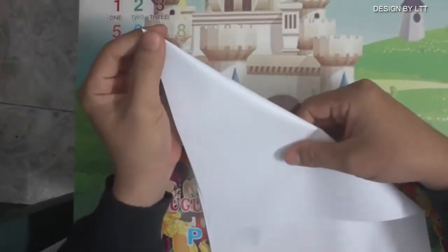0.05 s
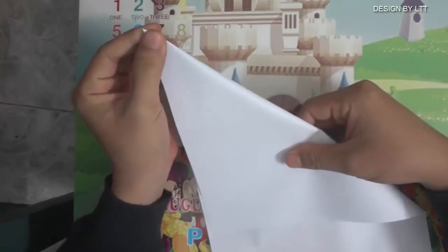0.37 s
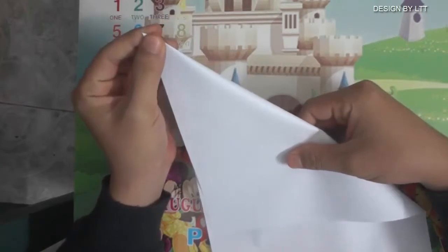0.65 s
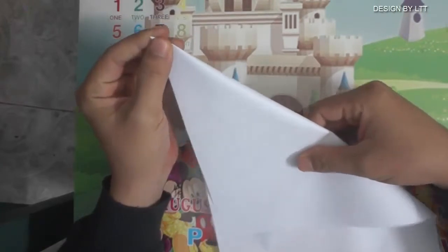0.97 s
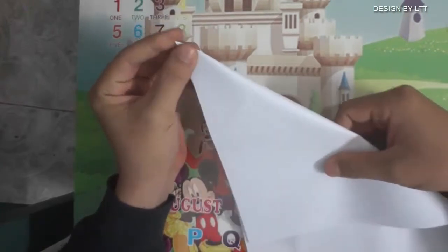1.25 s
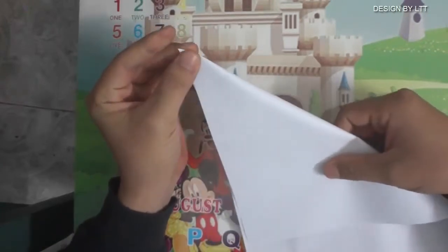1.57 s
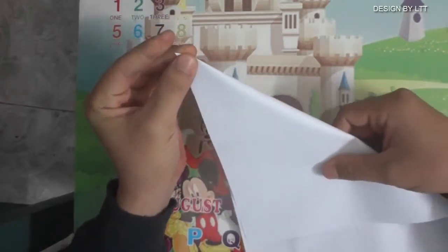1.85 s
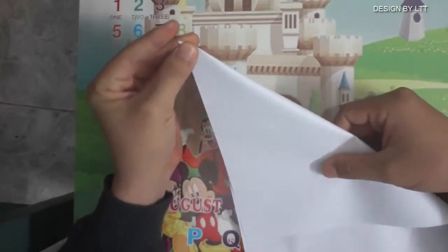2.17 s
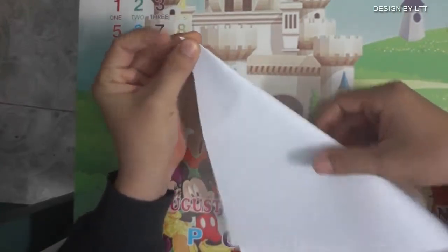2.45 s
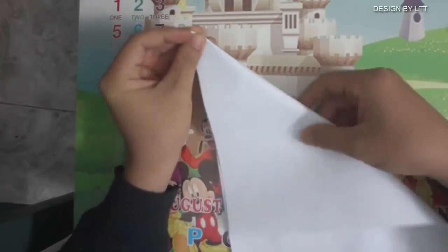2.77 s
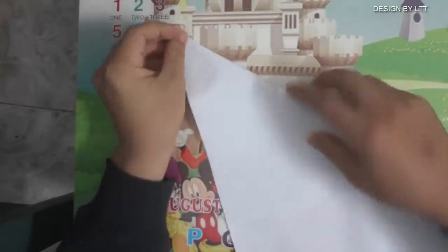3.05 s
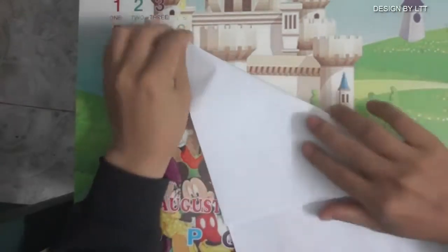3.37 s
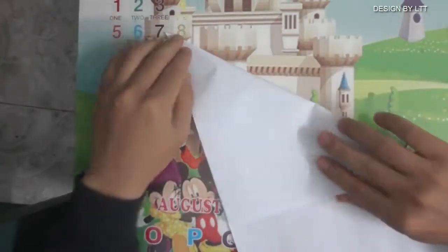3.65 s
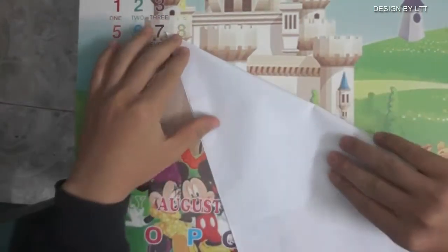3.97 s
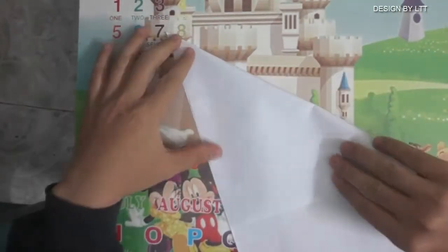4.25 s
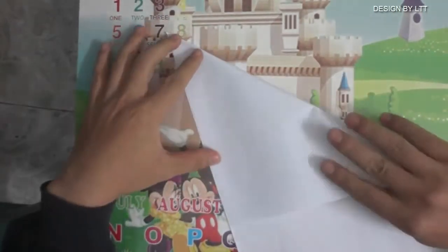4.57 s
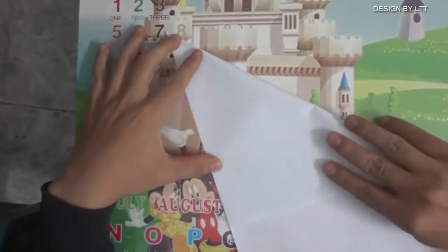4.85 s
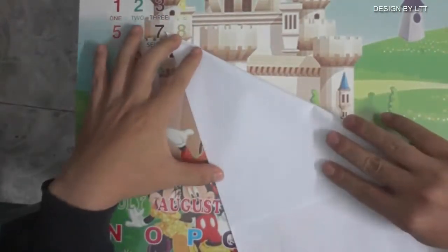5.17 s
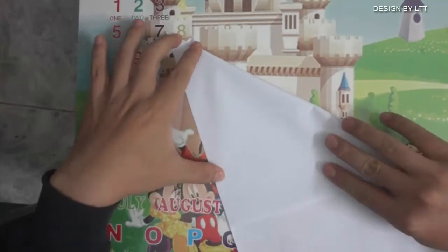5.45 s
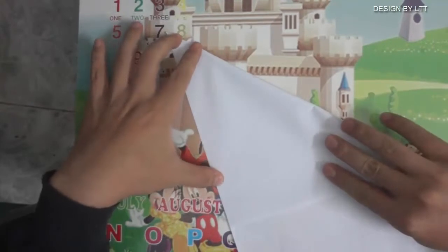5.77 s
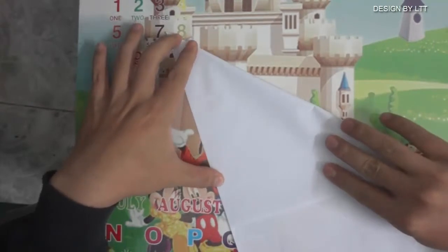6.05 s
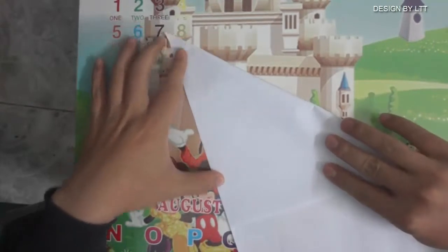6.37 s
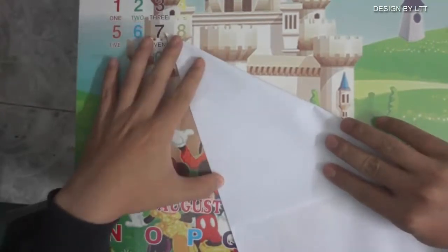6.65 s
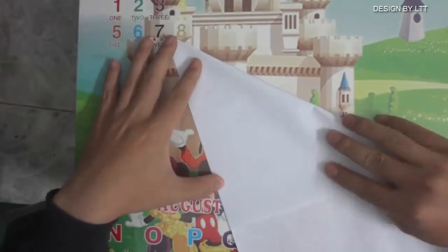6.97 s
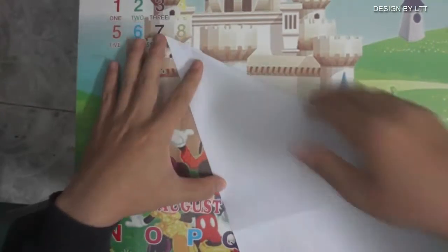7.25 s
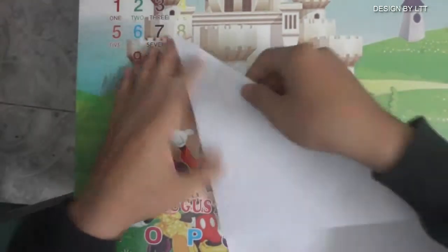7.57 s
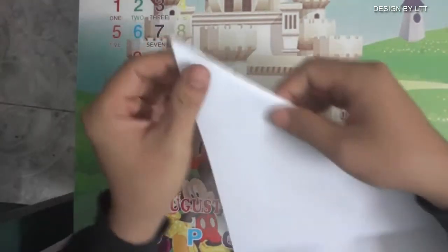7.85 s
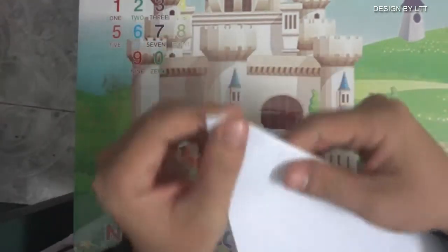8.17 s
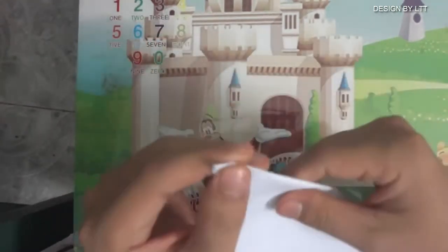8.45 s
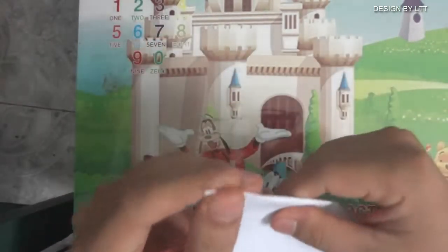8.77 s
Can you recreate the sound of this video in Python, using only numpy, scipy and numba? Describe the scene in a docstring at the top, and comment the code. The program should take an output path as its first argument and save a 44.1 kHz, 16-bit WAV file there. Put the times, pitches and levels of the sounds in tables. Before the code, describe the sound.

A sheet of paper is folded by hand close to the microphone in a small, quiet room. For the first two seconds there are light rustles and scattered crisp snaps as it bends. At about 2.5 seconds the sheet flaps with a soft bump, and a run of dry, hissing swipes follows as a palm smooths the crease against a board, strongest between 3 and 4 seconds. Softer rubs and crinkles continue, with a few dull taps and a faint low rumble from about 5.4 to 6 seconds. After a quieter moment, a sharp tick comes near 6.8 seconds and the rustling picks up. At 7.4 seconds a hand knocks the board, a low boom swells and fades, and the paper lifts with the loudest crack at 7.5 seconds. Lighter handling follows, with one more snap around 8.5 seconds.

```python
"""Folding paper on a board

Two hands fold a sheet close by in a small, quiet room. The paper buckles in sharp snaps; a palm sweeps
the crease and fingertips press it flat. Stick-slip friction gives each stroke its drag, hiss and fizz,
with stray crinkles. A hand knocks the board, a low boom swells and fades, and the sheet lifts with a
loud crack."""
import sys
import numpy as np
from scipy import signal
from scipy.fft import rfft, irfft
from scipy.io import wavfile
from numba import njit

SR = 44100
rng = np.random.default_rng(int(sys.argv[2]) if len(sys.argv) > 2 else 0)


def unload_wav(signal):
    """Save mono or channel-first audio to the path in sys.argv[1] as 16-bit WAV at rate SR, clipped to [-1, 1]."""
    wavfile.write(
        sys.argv[1],
        SR,
        np.round(np.clip(np.atleast_2d(signal).T, -1, 1) * 32767).astype(np.int16),
    )


N = 396900


# sharp paper snaps, short scuffs and the clicks of knocks:
# start_s, level_db, low_edge_hz, high_edge_hz, ring_over_pop_db
TRANSIENTS = [(0.002, -46.5, 4300, 4200, 24), (0.029, -53, 2960, 5200, 0), (0.0559, -64, 3000, 5000, 3),
              (0.101, -57.5, 2500, 6000, 3), (0.202, -60, 2450, 5500, 7), (0.221, -60, 1000, 4500, 2),
              (0.2785, -56, 604, 4460, 6), (0.3625, -57, 1100, 6000, 5), (0.429, -52, 4200, 5500, 16),
              (0.4974, -70, 3020, 5500, 5), (0.685, -56, 600, 6000, -1), (0.8003, -58.5, 597, 5460, 8),
              (0.819, -52.5, 900, 6760, 1), (0.9878, -60.5, 2520, 5500, 9), (1.0686, -57, 3300, 5400, 3),
              (1.081, -57, 4200, 6000, 3), (1.1111, -41, 720, 1550, -4.5), (1.176, -42.5, 830, 1150, -6),
              (1.1765, -36, 2820, 3500, -6), (1.278, -53, 560, 9800, 12), (1.3726, -47.5, 2830, 5800, 12),
              (1.385, -55, 2600, 5200, -3), (1.4693, -48, 3900, 5400, 12), (1.484, -51, 3900, 5300, 14),
              (1.502, -49.5, 3700, 5000, 14), (1.579, -57, 3500, 6000, 8), (1.6422, -42.5, 750, 2180, -6),
              (1.752, -56, 900, 6000, -2), (1.7778, -41.5, 620, 6260, -3), (1.971, -47.5, 1360, 7600, -2),
              (2.4296, -47.5, 800, 1870, -8), (2.504, -44, 593, 1150, -8), (2.5212, -42.5, 2700, 6740, 14),
              (2.5626, -48, 600, 3500, 2), (2.6614, -49.5, 696, 4500, 2), (2.7744, -43, 793, 2460, 1),
              (2.865, -46, 714, 2100, 15), (2.997, -44, 2230, 2240, 4), (3.072, -38.5, 1285, 3806, 6),
              (3.163, -50, 1090, 2800, 7), (3.266, -38, 2323, 4330, 7), (3.306, -37.5, 1480, 2095, 11),
              (3.7463, -38, 1150, 2500, 2), (3.933, -40, 1110, 2500, 8), (4.1762, -40, 1500, 7950, -9),
              (4.4254, -37, 1100, 3870, -3), (4.602, -59, 1400, 1590, -1), (4.6664, -53, 1400, 1700, 6),
              (4.673, -49, 730, 6550, 5), (4.831, -54.5, 1410, 5000, 3), (4.8764, -47, 1900, 3700, -9),
              (5.0706, -52, 1046, 6140, 8.5), (5.1158, -57, 1290, 5540, 2), (5.15, -56.5, 1300, 1810, -5),
              (5.1678, -52, 1200, 5500, 10), (5.263, -50.5, 1470, 5940, -10.5), (5.277, -52, 1400, 5800, 0),
              (5.315, -51, 1200, 4500, 3), (5.3445, -45.5, 1192, 4800, 14), (5.4356, -47, 900, 6430, -9),
              (5.6375, -48.5, 330, 12100, 16.5), (5.7654, -50.5, 333, 12500, -5),
              (5.848, -56.5, 330, 10400, 4), (5.8569, -52.5, 1000, 4200, 5), (5.993, -60.5, 565, 3840, 6),
              (6.363, -51, 920, 5100, 21), (6.6239, -50, 955, 1050, -8), (6.8434, -37, 3420, 4000, -10),
              (6.8438, -55.5, 298, 1410, -9), (7.057, -44, 1200, 6550, 2), (7.1065, -43.5, 1350, 5300, 2),
              (7.123, -41, 2600, 9000, 14), (7.259, -46, 2300, 3190, 12), (7.2922, -52, 1080, 4300, -9),
              (7.4135, -43.5, 380, 800, -4), (7.514, -46, 330, 8000, 22), (7.5306, -27, 2870, 3500, -6),
              (7.5307, -34, 6900, 7900, -20), (7.537, -38, 1020, 3540, -2), (7.637, -42, 1220, 1170, 4),
              (7.7103, -42.5, 1100, 3500, -6), (7.742, -53.5, 700, 1600, 3), (7.8506, -50.5, 2210, 5000, 2),
              (7.892, -53, 700, 2500, 5), (8.0766, -49.5, 2230, 6650, 3), (8.1883, -55, 2000, 5670, 5),
              (8.209, -48.5, 328, 1290, 6), (8.241, -48.5, 400, 4700, 12), (8.294, -50, 850, 7260, 15),
              (8.4642, -53.5, 495, 4500, -0.5), (8.542, -40.5, 1570, 3760, -6), (8.906, -59, 328, 8600, 8)]

def snaps(ring_s=0.0056, spread_s=0.000473, run_s=0.001346, count=4, pan_db=-1.9):
    """Dispersion: quick pops spread as bending waves; where their noisy ring dominates, a scuff."""
    t = np.arange(SR // 10) / SR
    hz = np.fft.rfftfreq(len(t), 1 / SR)
    travel_cycles = 2 * spread_s * np.sqrt(1000 * hz)  # high bending waves run faster
    strengths = from_db(-5.0 * np.abs(np.arange(count) - 1)) * (-1) ** np.arange(count)
    out = np.zeros(N + len(t))
    for start_s, db, low_hz, high_hz, ring_db in TRANSIENTS:
        lags_s = (np.arange(count) + rng.uniform(-0.49, 0.73, count)).clip(0) * run_s / count
        delays = np.exp(-2j * np.pi * (travel_cycles + lags_s[:, None] * hz))
        pops = irfft(strengths @ delays) * (t < t[-1] / 2)
        ring = rng.standard_normal(len(t)) * np.exp(-t / ring_s)
        pops, ring = (rms_one(ringing_band(part, low_hz, high_hz)) for part in (pops, ring))
        wave = band(pops + from_db(ring_db + 6.0) * ring, 0.17 * low_hz, 4.2 * high_hz)
        start = max(0, round(start_s * SR))
        out[start:start + len(t)] += from_db(db) * wave / np.std(wave[:SR // 125])  # first 8 ms
    return out[:N] * from_db([[pan_db / 2], [-pan_db / 2]])


# modes of the taut sheet after hard snaps: start_s, level_db, pitch_hz, t60_s
TAUT_MODES = [(6.844, -57.5, 1546, 0.49), (6.844, -47, 3270, 0.06), (7.531, -30, 3420, 0.094),
              (8.542, -42.5, 1600, 0.067), (8.542, -47, 3810, 0.22)]

def rings(width_hz=64):
    """Damped free vibration: a mode dies away, its phase blurred by the moving paper."""
    t = np.arange(SR // 3) / SR
    out = np.zeros(N + len(t))
    for start_s, db, hz, t60 in TAUT_MODES:
        blur = np.cumsum(rng.standard_normal(len(t))) * np.sqrt(2 * np.pi * width_hz / SR)
        start = round(start_s * SR)
        out[start:start + len(t)] += from_db(db - 60 * t / t60) * np.sin(2 * np.pi * hz * t + blur)
    return out[:N]


# strokes of skin on paper: start_s, swell_s, hold_s, then the grip:
# hiss_db, drag_over_hiss_db, fizz_over_hiss_db, sheet_hz, drag_hz, fizz_hz
STROKES = [(0.0, 0.002, 0.077, -57, -6.5, -5, 4600, 1070, 8500),
           (0.356, 0.0077, 0.0055, -50, -8.5, -7.5, 4470, 1090, 8300),
           (0.477, 0.018, 0.01, -55.5, -8, -4, 4530, 1080, 8600),
           (0.964, 0.13, 0.076, -56.5, -5, -4, 4000, 1090, 8700),
           (1.178, 0.032, 0.059, -52.5, -5, -4, 2300, 1200, 8800),
           (1.254, 0.029, 0.036, -54, -13.5, -1, 3800, 1300, 9200),
           (1.358, 0.0073, 0.012, -50, -23, -9, 4460, 1455, 7000),
           (1.453, 0.013, 0.035, -51, -12.5, -11, 4870, 1500, 7500),
           (1.634, .01, 0.058, -65.5, 0, -18, 2300, 940, 7000),
           (1.782, 0.012, 0.22, -65.5, -2, -3, 4800, 1000, 8700),
           (2.421, 0.046, 0.069, -52.5, 0.5, -0.5, 3120, 960, 9100),
           (2.544, 0.021, 0.05, -51.5, -7, 1.5, 3340, 1090, 9300),
           (2.622, 0.052, 0.12, -54, -3.5, -4, 2720, 1300, 8500),
           (2.717, 0.12, 0.038, -46.5, -7.5, 3.5, 2180, 1510, 8570),
           (2.984, 0.07, 0.044, -45.5, -17, 3.5, 3830, 1440, 9000),
           (3.127, 0.048, 0.067, -46, -7, -0.5, 2410, 1440, 9100),
           (3.22, 0.037, 0.076, -42, -5.5, 2, 2280, 1450, 10000),
           (3.349, 0.022, 0.04, -42, 0.5, -2, 2200, 1310, 9100),
           (3.397, 0.049, 0.14, -43.5, -6, 1.5, 4330, 1520, 9450),
           (3.602, 0.021, 0.15, -48.5, -1, 1, 3400, 1200, 9300),
           (3.637, 0.0064, 0.018, -48.5, 2, -1, 3500, 1290, 9000),
           (3.747, 0.097, 0.1, -46, -6.5, 0, 2900, 1700, 9150),
           (4.063, 0.078, 0.16, -53.5, -7, -0.5, 3170, 1605, 9300),
           (4.354, 0.022, 0.12, -53, -6, -0.5, 2990, 1520, 9120),
           (4.409, 0.014, 0.033, -49.5, -2.5, 1.5, 2940, 1540, 9300),
           (4.536, 0.02, 0.15, -55, -2.5, -0.5, 3070, 1440, 9100),
           (4.601, 0.0052, .02, -56.5, 9.5, -12, 3060, 1380, 8000),
           (4.715, 0.03, 0.035, -56.5, 0.5, -3, 2820, 1510, 8800),
           (4.855, 0.02, 0.14, -62, -8, 1, 2900, 1510, 9300),
           (5.105, 0.011, 0.06, -60.5, -1, -1.5, 3070, 1540, 9100),
           (5.256, 0.01, 0.0091, -50.5, -5, -5, 3500, 1580, 8400),
           (5.322, 0.023, 0.055, -50.5, -1, -4.5, 2900, 1650, 8600),
           (5.659, 0.017, .01, -65.5, 6.5, -2, 3000, 1430, 9000),
           (5.851, 0.0082, .008, -60, 9.5, -6, 2960, 1360, 8600),
           (6.052, 0.0041, 0.006, -69.5, -5, 13.5, 4000, 1420, 12000),
           (6.197, 0.02, 0.018, -66.5, -18, 15, 4200, 1430, 11500),
           (6.268, 0.12, 0.079, -59, -17, 5, 3500, 1270, 11300),
           (6.532, 0.024, 0.069, -57.5, -24, 2, 4550, 1150, 10800),
           (6.854, 0.027, 0.034, -59.5, -8, -5, 3300, 1540, 8600),
           (6.98, 0.014, 0.025, -54, 1.5, -3, 3300, 1510, 8840),
           (7.027, 0.024, 0.010, -47.5, 3.5, -0.5, 3100, 1490, 9200),
           (7.099, 0.014, 0.008, -41, -4, 2, 2840, 1440, 10000),
           (7.178, 0.02, 0.0074, -48, -8, -1, 2800, 1480, 9500),
           (7.229, 0.018, 0.013, -44.5, -11, -1.5, 2520, 1440, 9470),
           (7.296, 0.031, 0.086, -57.5, -11, 2, 2980, 1390, 9300),
           (7.386, 0.027, 0.047, -47.5, -16, 0, 3400, 1300, 9300),
           (7.522, 0.0087, 0.065, -42, -9.5, -3.5, 2970, 1230, 8000),
           (7.598, 0.019, 0.0037, -39.5, -8, 1.5, 2800, 1250, 9000),
           (7.666, 0.024, 0.011, -53.5, -3, 4.5, 2720, 1110, 9500),
           (7.735, 0.023, 0.04, -55.5, -16, -1, 2900, 1000, 9000),
           (7.823, 0.056, 0.075, -50.5, -9.5, -3.5, 3920, 845, 8700),
           (8.048, 0.026, 0.14, -55.5, -14, 0.5, 3120, 1316, 9200),
           (8.162, 0.032, 0.16, -54, -10.5, -2.5, 3080, 1490, 8800),
           (8.456, 0.022, 0.014, -56, -2, 2, 3400, 1600, 9350),
           (8.535, 0.026, 0.021, -52.5, -7.5, 0.5, 3620, 1690, 9200),
           (8.614, 0.051, 0.11, -67, -19, 1, 3800, 1400, 9400),
           (8.894, 0.0062, 0.01, -61.5, 0, -1, 3600, 1140, 9100)]
# the held sheet's constant stir: the six grip columns above
RESTING_GRIP = (-75.5, -1.5, 1.5, 4000, 1150, 9400)

def hands(release_s=0.021, release_per_swell=0.93):
    """Incoherent addition: strokes sum in power into three gains and three power-weighted pitches."""
    t = np.arange(0, N, 40) / SR
    shapes = [envelope(t, start, swell, hold, release_s + release_per_swell * swell)
              for start, swell, hold, *_ in STROKES]
    shapes = np.array(shapes + [np.ones(len(t))]).T
    grips = [row[3:] for row in STROKES] + [RESTING_GRIP]
    hiss_db, drag_db, fizz_db, sheet_hz, drag_hz, fizz_hz = np.transpose(grips)
    powers = [(shapes * from_db(db)) ** 2 for db in (hiss_db + drag_db, hiss_db, hiss_db + fizz_db)]
    gains = [np.sqrt(power.sum(axis=1)) for power in powers]
    pitches = [power @ hz / power.sum(axis=1) for power, hz in zip(powers, (drag_hz, sheet_hz, fizz_hz))]
    return [np.interp(np.arange(N) / SR, t, control) for control in gains + pitches]


def slips(per_s, spread_db):
    """Shot noise: fibres catch and let go in uneven impulses, with the same power at any rate."""
    sizes = from_db(spread_db * np.minimum(rng.exponential(1, N), 4))
    return sizes * rng.choice([-1, 1], N) * (rng.random(N) < per_s / SR) / np.sqrt(per_s)


def sliding(drag, hiss, fizz, drag_hz, sheet_hz, fizz_hz, slow_per_s=260, fast_per_s=17000):
    """Stick-slip friction: slips are separate under a light touch and merge under a fast one."""
    per_s = slow_per_s + fast_per_s * (hiss / hiss.max()) ** 1.9
    rasp = slips(per_s * .25, spread_db=2.5)
    grit = slips(per_s, spread_db=2.0)
    dust = slips(12000, spread_db=3.0)
    wander = 1 + 0.027 * drift(rate=35)  # the fingers never hold quite still
    rub = from_db(-4.5) * drag * finger_drag(rasp, grit, drag_hz * wander)
    rub += from_db(-1.16) * hiss * paper_hiss(rasp, grit, per_s, sheet_hz, wander)
    rub += from_db(-2.95) * fizz * fibre_fizz(dust, fizz_hz)
    flutter_db = 0.62 * drift(rate=110) + 0.29 * drift(rate=24)
    return from_db(flutter_db) * rub


# resonances of the sheet under the fingers: centre_hz, width_hz, gain_db
DRAG_MODES = [(1170, 350, 1.5), (1390, 110, 4.5), (1510, 57, 6), (2000, 230, -3)]

def finger_drag(rasp, grit, drag_hz):
    """Forced resonance: slips drive the pressed sheet, swelling as skin sticks and lets go."""
    gripped = moving_resonance(rasp, drag_hz, width_hz=400)
    body = rms_one(band(resonate(grit, DRAG_MODES), 980, 1830))
    sticking_db = 2.7 * drift(rate=150)
    return rms_one((gripped + from_db(0.5) * body) * from_db(sticking_db))


# resonances of the sliding sheet: centre_hz, width_hz, gain_db
HISS_MODES = [(2230, 330, -1.5), (2900, 400, -1.5), (3510, 760, 0), (4200, 970, 2.5), (5100, 2340, 0),
              (6170, 1740, -7.5)]

def paper_hiss(rasp, grit, per_s, sheet_hz, wander, upper_gap_hz=1150):
    """Modal overlap: broad resonances blend into a dry hiss; two of them shift with the grip."""
    body = rms_one(band(resonate(grit, HISS_MODES), 2570, 8900))
    lower = moving_resonance(slips(per_s, spread_db=1.5), sheet_hz * wander, width_hz=940)
    upper = moving_resonance(rasp, (sheet_hz + upper_gap_hz) * wander, width_hz=1400)
    return rms_one(body + from_db(-6.0) * lower + from_db(-6.5) * upper)


# spectrum of slipping fibres: frequency_hz, density_db
FIZZ_SPECTRUM = [(4500, -14.5), (6500, 1), (7600, 0.5), (9500, 1), (11500, -1.5), (14000, -4), (16000, -5)]

def fibre_fizz(dust, fizz_hz):
    """Filtered shot noise: dense, tiny slips fill the top octaves, with one moving peak."""
    broad = colour(slips(7000, spread_db=1.5), FIZZ_SPECTRUM)
    return rms_one(broad + from_db(-5.5) * moving_resonance(dust, fizz_hz, width_hz=4100))


def breadth(fizz):
    """An extended source: part of the broad sheet's fizz differs between left and right."""
    side = rms_one(band(colour(slips(5000, spread_db=-7.0), FIZZ_SPECTRUM), 4500, 6200))
    return from_db(-21.0) * fizz * side * [[1], [-1]]


def crinkles(hiss, decay_s=0.0019):
    """Snap-through: tiny wrinkles flip in the moving sheet; sparse ticks go on while it is held."""
    t = np.arange(SR // 100) / SR
    grains = rng.standard_normal((2, len(t))) * np.exp(-t / decay_s)
    flips = signal.oaconvolve(slips(per_s=49.0, spread_db=2.0), grains[0])[:N]
    ticks = signal.oaconvolve(slips(per_s=14, spread_db=3.0), grains[1])[:N]
    tick_gain = from_db(-61.5) * (hiss / hiss.max()) ** 0.75
    return (from_db(-14.5) * hiss * rms_one(band(flips, 2300, 4200))
            + tick_gain * rms_one(band(ticks, 1150, 6600)))


# peaks and hollows that colour every rub: centre_hz, width_hz, gain_db
SHEET_MODES = [(1535, 86, 4), (1900, 380, -2.5), (2310, 110, 2.5), (2550, 150, -3), (2794, 104, 4.5),
               (3500, 120, 2.5), (4160, 170, 2), (4520, 200, -0.5), (5400, 170, 2), (6120, 220, 4.5),
               (6750, 340, -1.5), (9300, 500, 1)]

def sheet_modes(x, vary_db=2.0):
    """Standing waves: each keeps its pitch, but grows and shrinks a little as the hands move."""
    out = x
    for hz, width, db in SHEET_MODES:
        rung = signal.lfilter(*signal.iirpeak(hz, hz / width, fs=SR), x)
        out = out + (from_db(db + vary_db * drift(rate=9)) - 1) * rung
    return out


# the whole sheet bends: start_s, swell_s, hold_s, level_db
FLAPS = [(1.08, 0.038, 0.018, -64.5), (2.46, 0.046, 0.026, -54), (2.66, 0.13, 0.41, -64.5),
         (3.32, 0.079, 0.0082, -60.5), (3.8, 0.089, 0.46, -72.5), (4.38, 0.037, 0.017, -61.5),
         (7.4, 0.018, 0.028, -59), (7.52, 0.047, 0.033, -53), (7.62, 0.074, 0.18, -62.5),
         (8.18, 0.03, 0.61, -65)]
# spectrum of the pushed air: frequency_hz, density_db
FLAP_SPECTRUM = [(70, -19), (140, -4.5), (250, 1), (400, 2), (800, -0.5), (1200, -5.5), (2500, -51)]

def flapping():
    """Radiation from a moving surface: the broad sheet pushes air as it bends."""
    gain = from_db(2.0) * swells(FLAPS, release_s=0.18, rest_db=-73)
    return gain * colour(diffuse(N), FLAP_SPECTRUM)


# hands meet the board: start_s, level_db, most_excited_hz
KNOCKS = [(2.521, -46, 280), (5.436, -54, 346), (5.446, -46.5, 160), (5.639, -48, 440), (5.767, -49, 436),
          (5.85, -47, 460), (7.4148, -36.5, 277), (7.531, -39, 220), (8.21, -55, 351)]
# modes of the board: pitch_hz, gain_db, t60_s
BOARD_MODES = [(93, -5, 0.34), (146, -8.5, 0.68), (198, -15, 0.12), (245, -3, 0.22), (280, -10, 0.56),
               (319, -5, 0.11), (406, 0.5, 0.066), (564, 0.5, 0.036), (720, -3, 0.04)]

def knocks(variety_db=2.5):
    """Impact excitation: a soft blow gives a dull push and rings the modes in a new mix each time."""
    start_s, blow_db, contact_hz = np.transpose(KNOCKS)
    starts = np.round(start_s * SR).astype(int)
    blows = np.zeros(N) + 1e-18
    blows[starts] = from_db(blow_db)
    out = from_db(17.0) * band(blows, 160, 510)
    for hz, db, t60 in BOARD_MODES:
        octaves_off = np.abs(np.log2(hz / contact_hz))
        blows[starts] = from_db(blow_db + db - 10.0 * octaves_off + rng.normal(0, variety_db, len(starts)))
        r, w = from_db(-60 / (t60 * SR)), 2 * np.pi * hz / SR
        out += signal.lfilter([0, np.sin(w)], [1, -2 * r * np.cos(w), r * r], blows)
    return out


# swells of the low boom: start_s, swell_s, hold_s, level_db
BOOMS = [(4.1, 0.41, 0.21, -75), (5.25, 0.14, 0.32, -63), (5.72, 0.14, 0.082, -60),
         (7.39, 0.069, 0.14, -53.5), (7.54, 0.13, 0.1, -49)]
# its partials: pitch_hz, gain_db
BOOM_TONES = [(56, 2), (71, -12), (96, -42), (141, -18), (274, -14.5)]

def boom(waver_hz=0.93):
    """Random frequency modulation: deep tones waver, with a little rumble around them."""
    tones = sum(from_db(db) * np.sin(2 * np.pi * np.cumsum(hz + waver_hz * drift(rate=12)) / SR)
                for hz, db in BOOM_TONES)
    rumble = rms_one(band(rng.standard_normal(N), 42, 136))
    return swells(BOOMS, release_s=0.15, rest_db=-84) * (np.sqrt(2) * tones + from_db(-9.0) * rumble)


# decay of the room: frequency_hz, t60_s
ROOM_DECAY = [(150, 0.19), (500, 0.69), (1500, 0.93), (4000, 0.47), (9000, 0.29), (15000, 0.029)]

def room(x, onset_s=0.00049):
    """Reverberation: diffuse reflections decay exponentially, lasting longest in the midrange."""
    t = np.arange(SR // 2) / SR
    noise, response = diffuse(len(t)), 0
    edges_hz = np.geomspace(100, 16000, 9)
    for low, high in zip(edges_hz, edges_hz[1:]):
        part = signal.sosfilt(signal.butter(2, [low, high], "band", fs=SR, output="sos"), noise)
        t60 = at_hz(ROOM_DECAY, np.sqrt(low * high))
        response = -response + part * from_db(-60 * t / t60)  # alternating signs leave no gaps
    response = band(response * (1 - np.exp(-t / onset_s)), 93, 10200)
    return signal.fftconvolve(x[None], rms_one(response) / np.sqrt(len(t)), axes=1)[:, :N]


# spectrum of still room air: frequency_hz, density_db
AIR_SPECTRUM = [(15, -36), (25, -5.5), (70, 0), (212, -2.5), (256, -0.5), (451, -5), (695, -4), (840, -4.5),
                (1650, -12), (3920, -13), (4250, -12.5), (6740, -21.5), (12200, -23.5), (14800, -37),
                (16000, -50)]
# a faint narrow hiss: time_s, level_db, centre_hz
WHINE = [(0, -70, 4060), (0.6, -76.5, 4100), (2.3, -86, 4096), (4.5, -90, 4100), (5.1, -71.5, 4100),
         (6.8, -70, 4020), (8.2, -79, 3900), (8.7, -64.5, 3830), (9, -69, 3900)]

def background(air_db=-60.5, wander_hz=50):
    """Ambient noise: broadband room air, and a faint narrow band that wavers in the treble."""
    time_s, *columns = np.transpose(WHINE)
    db, hz = (np.interp(np.arange(N) / SR, time_s, column) for column in columns)
    whine = moving_resonance(rng.standard_normal(N), hz + wander_hz * drift(rate=26), width_hz=320)
    waver_db = 1.5 * drift(rate=25)
    return from_db(air_db) * colour(diffuse(N), AIR_SPECTRUM) + from_db(db + waver_db) * whine


# left-right likeness of diffuse sound: frequency_hz, coherence_ratio
COHERENCE = [(60, 0.88), (125, 0.72), (250, 0.33), (500, 0), (1300, 0), (2200, 0.28), (4000, 0.43),
             (10000, 0.93)]

def diffuse(size):
    """A diffuse field: white noise from all sides is partly coherent at two nearby points."""
    alike = np.clip(at_hz(COHERENCE, np.fft.rfftfreq(size, 1 / SR)), 0, 1)
    mid, side = rfft(rng.standard_normal((2, size)))
    return irfft(np.sqrt(1 + alike) * mid + np.sqrt(1 - alike) * side * [[1], [-1]], size)


def from_db(db):
    """Decibels to gain."""
    return np.exp(np.asarray(db) * np.log(10) / 20)


def rms_one(x):
    """Normalisation to unit rms."""
    return x / np.sqrt(np.mean(x ** 2) + 1e-20)


def at_hz(points, hz):
    """Interpolation on a log-frequency axis."""
    f, value = np.transpose(points)
    return np.interp(np.log(hz + 1e-9), np.log(f), value)


def drift(rate):
    """Slow random modulation through `rate` points a second; rms 1."""
    knots = rng.standard_normal(4000)
    return rms_one(np.interp(np.arange(N) / SR * rate, np.arange(len(knots)), knots))


def envelope(t, start, swell, hold, release):
    """Linear rise, hold and exponential decay."""
    age = t - start
    return np.clip(age / max(swell, 1e-4), 0, 1) * np.exp(-np.maximum(age - swell - hold, 0) / release)


def swells(rows, release_s, rest_db):
    """Power summation of swells over a resting level, as gain per sample."""
    t = np.arange(0, N, 40) / SR
    power = sum((from_db(db) * envelope(t, start, swell, hold, release_s)) ** 2
                for start, swell, hold, db in rows)
    return np.interp(np.arange(N) / SR, t, np.sqrt(power + from_db(rest_db) ** 2))


def colour(x, spectrum):
    """Spectral shaping by a smooth curve; rms 1."""
    return rms_one(irfft(rfft(x) * from_db(at_hz(spectrum, np.fft.rfftfreq(N, 1 / SR))), N))


def band(x, low_hz, high_hz):
    """Second-order high-pass and low-pass."""
    for hz, kind in ((low_hz, "high"), (high_hz, "low")):
        x = signal.sosfilt(signal.butter(2, min(hz, .45 * SR), kind, fs=SR, output="sos"), x)
    return x


def ringing_band(x, low_hz, high_hz, low_q=1.53, high_q=1.31):
    """Underdamped high-pass and low-pass: each rings at its edge."""
    for hz, q, sign in ((low_hz, low_q, -1), (high_hz, high_q, 1)):
        w = 2 * np.pi * min(hz, .45 * SR) / SR
        damping = np.sin(w) / (2 * q)
        x = signal.lfilter([1, 2 * sign, 1], [1 + damping, -2 * np.cos(w), 1 - damping], x)
    return x


def resonate(x, modes):
    """Modal superposition: parallel resonances of alternating sign; rms 1."""
    out = 0
    for k, (hz, width, db) in enumerate(modes):
        r, w = np.exp(-np.pi * width / SR), 2 * np.pi * hz / SR
        rung = signal.lfilter([1, 0, -1], [1, -2 * r * np.cos(w), r * r], x)
        out = out + (-1) ** k * from_db(db) * (1 - r * r) * rung
    return rms_one(out)


@njit
def glide(x, hz, width_hz):
    """A time-varying resonator, retuned every 16 samples."""
    out, state, pole = np.zeros(len(x)), 0j, 0j
    for i in range(len(x)):
        if i % 16 == 0:
            pole = np.exp(np.pi * (2j * hz[i] - width_hz) / SR)
        state = state * pole + x[i]
        out[i] = state.real
    return out


def moving_resonance(x, hz, width_hz):
    """Two gliding resonators in cascade, for steep skirts; rms 1."""
    return rms_one(glide(glide(x, hz, width_hz), hz, width_hz))


def scene():
    """Superposition: direct sound from a little to the right, its reflections and the background."""
    drag, hiss, fizz, *pitches = hands()
    sheet = sheet_modes(sliding(drag, hiss, fizz, *pitches) + crinkles(hiss)) + rings()
    direct = (sheet + knocks()) * from_db([[-.45], [.35]]) + snaps() + breadth(fizz)
    return direct + from_db(-11.0) * room(direct.mean(axis=0)) + flapping() + boom() + background()


def record(dry):
    """Band limiting: a steep low-pass at 15.9 kHz."""
    return signal.sosfilt(signal.ellip(12, .1, 80, 15900, fs=SR, output="sos"), dry)


dry = scene()
out = record(dry)
unload_wav(out)
```